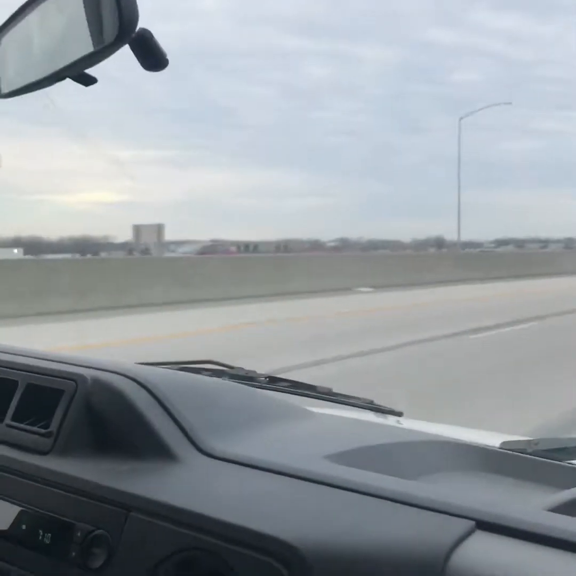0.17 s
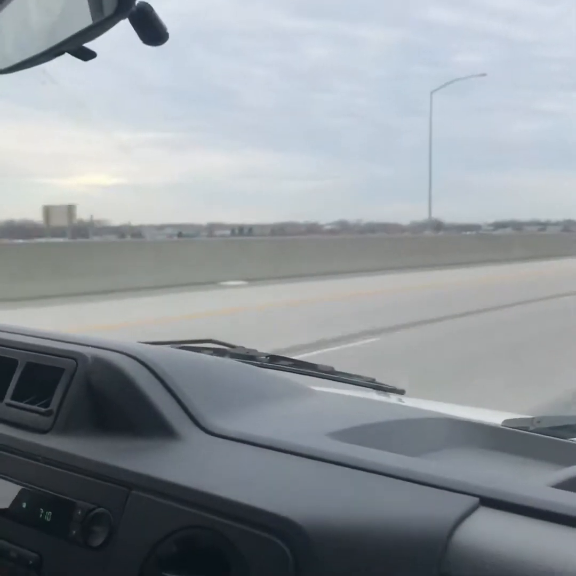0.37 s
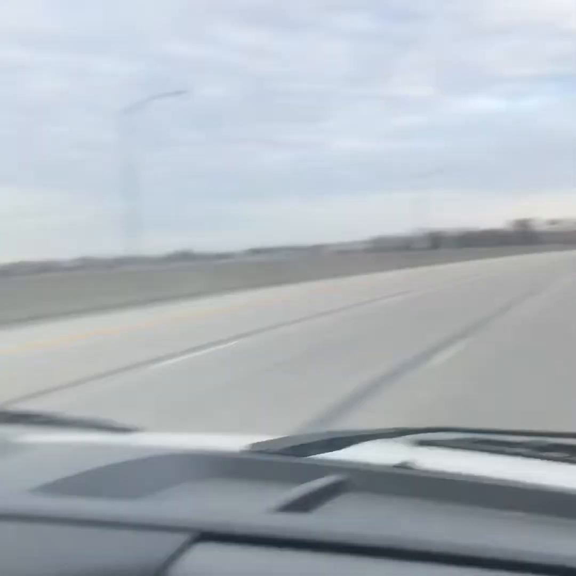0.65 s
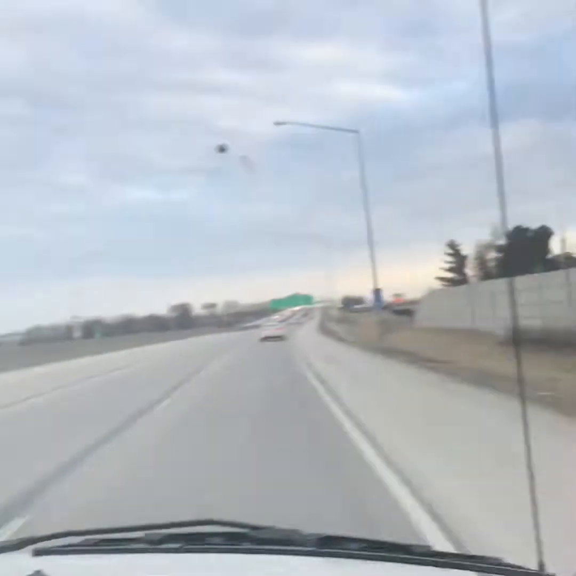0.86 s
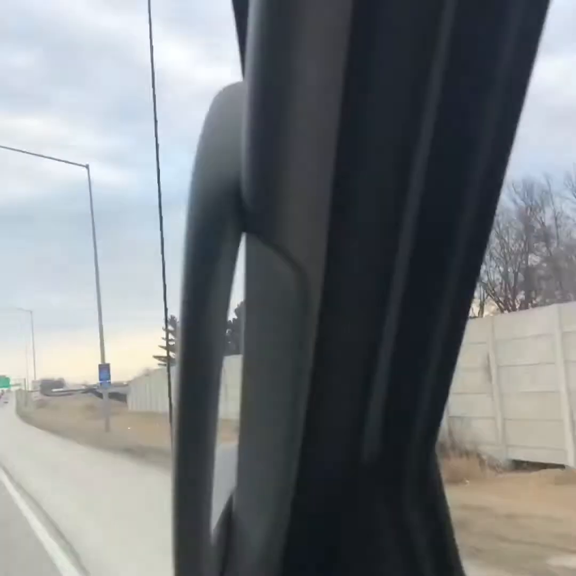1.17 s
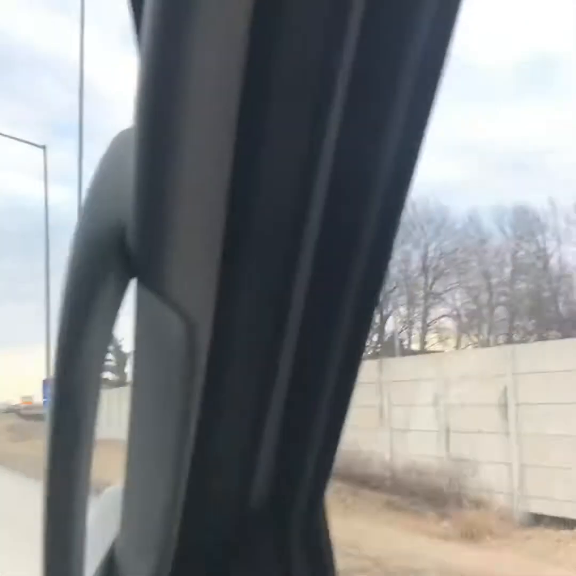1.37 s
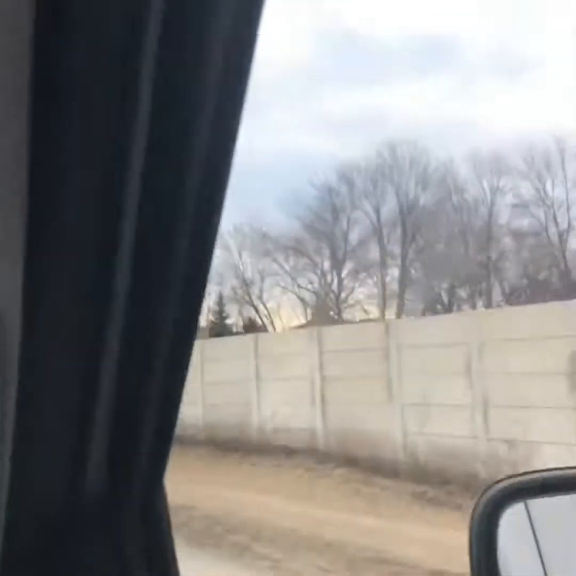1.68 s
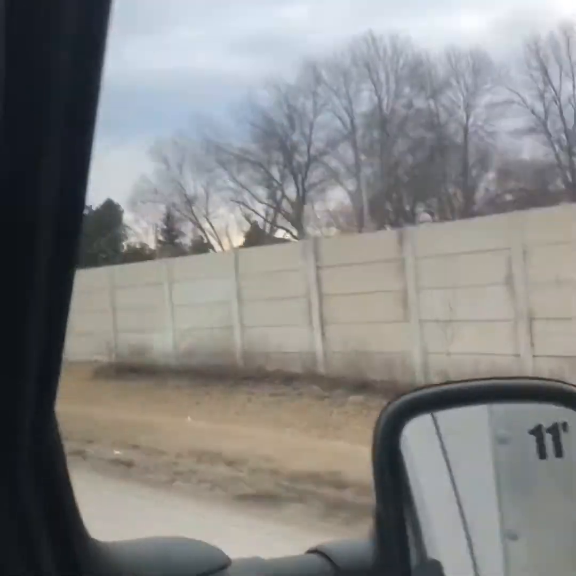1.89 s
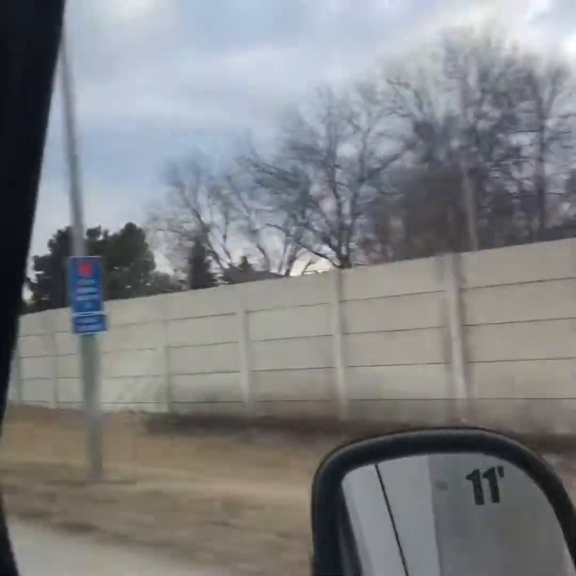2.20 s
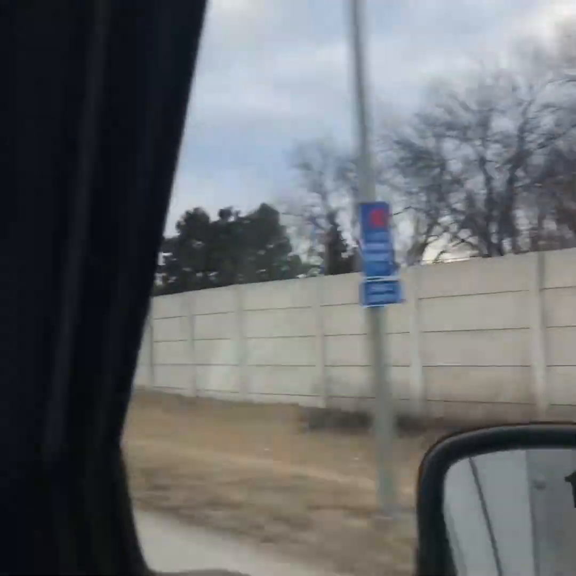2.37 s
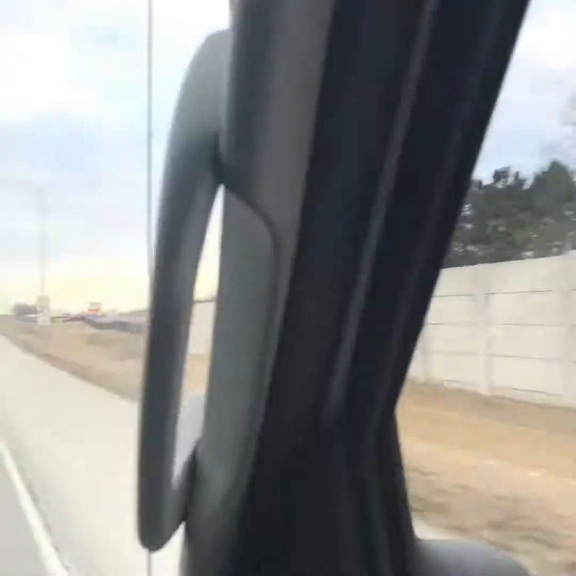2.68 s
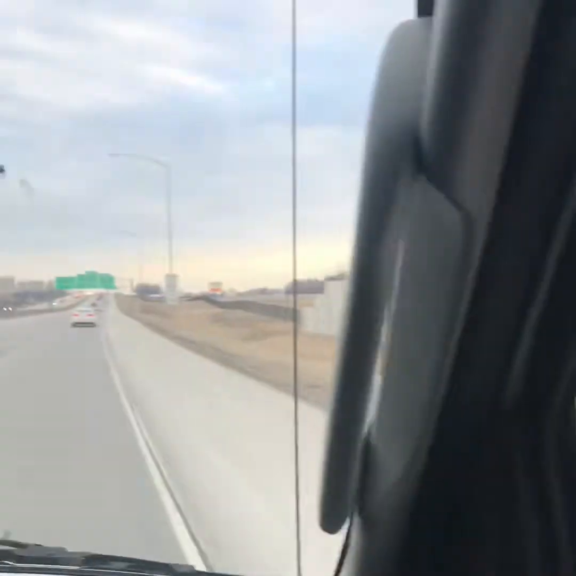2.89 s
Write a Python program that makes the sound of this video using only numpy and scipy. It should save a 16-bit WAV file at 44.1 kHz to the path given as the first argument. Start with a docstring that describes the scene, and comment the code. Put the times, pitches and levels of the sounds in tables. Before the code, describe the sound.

Steady truck engine drone and highway rumble inside the cab, with faint whistling wind.

```python
"""A truck engine drones at cruising speed, heard inside the cab through a hand-held phone.
Its periodic firing gives harmonics of the four-stroke cycle. The highway shakes the body, exciting
a rumble, booming cab resonances and damped thumps. Tyre hiss passes through the panels, air rushes
over the cab, and wind sings at the door and mirror with a breathy, wavering pitch.
Loose trim ticks and crackles faintly."""
import sys
import numpy as np
from scipy import signal
from scipy.fft import rfft, irfft, next_fast_len
from scipy.io import wavfile

SR = 44100
rng = np.random.default_rng(int(sys.argv[2]) if len(sys.argv) > 2 else 0)


def bounce(signal):
    """Save signal as a 16-bit WAV file at the path given by the first command-line argument."""
    frames = np.transpose(np.atleast_2d(signal))
    limited = np.clip(frames, -1, 1)
    pcm = np.round(limited * 32767).astype(np.int16)
    wavfile.write(sys.argv[1], SR, pcm)


N = 134505
T = np.arange(N) / SR

# Levels in the tables are relative: the functions apply further gains.
# Harmonics of the four-stroke cycle: harmonic_number, level_db
ENGINE_HARMONICS = [(2, -37.5), (3, -30), (4, -40.5), (6, -38), (9, -54), (10, -45.5), (12, -55.5),
                    (15, -52.5), (16, -60), (17, -61), (18, -56.5), (19, -62), (20, -64.5), (25, -63),
                    (28, -57), (29, -64), (30, -60), (33, -65), (68, -57)]
# Cab resonances driven by the wheels: centre_hz, half_width_hz, level_db
CAB_MODES = [(31.3, 1.7, -29.5), (41.5, 7.6, -30), (96.6, 2.7, -40)]
# Spectrum of the road rumble: frequency_hz, density_db
ROAD_SPECTRUM = [(8, -37), (20, -9), (29, 0.5), (45, -1.5), (58, -7.5), (78, 0.5), (125, -5), (165, -7.5),
                 (200, -19), (270, -21), (350, -26), (430, -31.5), (700, -43.5), (1500, -77)]
# Envelope of the rumble and cab resonances: time_s, level_db
ROAD_ENVELOPE = [(0, -3), (.2, 0), (.55, -1), (.7, 1), (1.0, -1), (1.23, -1.5), (1.35, -1.5), (1.55, -1),
                 (1.7, -1), (2.05, 1.5), (2.35, 1.6), (2.7, -2), (2.85, -1), (3.0, -1)]
# Thumps from bumps in the road: start_s, pitch_hz, peak_db, decay_s
ROAD_BUMPS = [(.61, 65, -18, 0.035), (0.671, 99, -18.5, 0.023), (.955, 63.5, -22.5, 0.026),
              (1.21, 53.4, -15, 0.029), (1.515, 64, -13.5, .04), (1.547, 89.6, -14.5, 0.022),
              (2.275, 45.8, -15, 0.038), (2.41, 90, -14, 0.011)]
# Spectrum of tyre noise behind the panels: frequency_hz, density_db
TYRE_SPECTRUM = [(200, -13), (400, -4.5), (520, -2), (660, -3), (770, -3), (840, 1), (1100, -.5),
                 (1200, -1.5), (1350, 1.5), (1600, -2), (1720, -5), (1810, -12.5), (2000, -16), (2600, -31),
                 (4000, -57.5)]
# Spectrum of air rushing over the cab: frequency_hz, density_db
AIR_SPECTRUM = [(900, -38), (1750, -8.5), (1930, -4.5), (2060, -1), (2250, 1), (2460, 1), (2650, -4),
                (2900, -11), (3100, -14), (3500, -21.5), (4400, -27.5), (4950, -34), (6000, -36),
                (7500, -42.5), (10000, -49)]
# Two wind tones at the door: time_s, upper_pitch_hz, upper_level_db, lower_level_db
WIND_TONES = [(0, 1424, -50, -53), (.22, 1402, -38.5, -43), (.3, 1405, -47, -52), (.45, 1421, -45.5, -50),
              (.55, 1440, -40, -45), (.65, 1429, -44, -49), (.72, 1445, -50, -47.5), (.92, 1479, -48, -53),
              (1.01, 1496, -41.5, -46), (1.08, 1458, -43.5, -41), (1.14, 1468, -41, -41),
              (1.22, 1475, -54, -45), (1.29, 1485, -43, -53.5), (1.37, 1484, -54, -51),
              (1.46, 1474, -40.5, -41.5), (1.53, 1469, -42.5, -46), (1.7, 1465, -51.5, -46.5),
              (1.87, 1435, -40.5, -51), (1.95, 1428, -48.5, -56), (2.01, 1441, -39.5, -54),
              (2.17, 1436, -45, -62.5), (2.35, 1425, -41.5, -63), (2.46, 1438, -49, -56),
              (2.55, 1460, -47.5, -50), (2.75, 1494, -44, -47.5), (2.85, 1479, -50, -48),
              (3.04, 1482, -43, -47)]
# Envelope of a third, higher wind tone: time_s, level_db
THIRD_TONE_ENVELOPE = [(0, -59), (.95, -54), (1.08, -47), (1.14, -52), (1.21, -44.5), (1.35, -54.5),
                       (1.7, -58), (3.0, -58)]
# Impacts of loose trim: peak_time_s, level_db, decay_s
TRIM_TICKS = [(.113, -64, .003), (.613, -54, .005), (.625, -52, .003), (.748, -53, .002), (.848, -55, .003),
              (.868, -62, .003), (1.381, -62, .003), (1.412, -59.5, .003), (1.513, -66, .005),
              (1.521, -51, .003), (1.569, -56, .002), (1.739, -62, .002), (1.818, -57, .008),
              (1.83, -61, .016)]
# Spectrum of the ticks: frequency_hz, density_db
TICK_SPECTRUM = [(2000, -7.5), (3400, 6), (5200, -1.5), (7000, -14), (10000, -24), (14000, -32.5)]
# Spectrum of the fine trim chatter: frequency_hz, density_db
CRACKLE_SPECTRUM = [(3000, -4), (4200, 4.5), (6500, -1), (10400, -11.5), (12700, -3.5), (15500, -7.5)]
# Spectrum of microphone self-noise: frequency_hz, density_db
HISS_SPECTRUM = [(3000, 2.5), (7000, -11), (9000, 1.5), (10400, -12.5), (11500, -1.5), (12700, 2.5),
                 (15500, 5.5)]


def undb(db):
    """Amplitude grows tenfold for every 20 decibels."""
    return 10 ** (np.asarray(db) / 20)


def noise(gain_at):
    """Spectral shaping: white noise is weighted by a function of frequency and scaled to unit rms."""
    size = next_fast_len(N, True)
    hz = np.maximum(np.arange(size // 2 + 1) * SR / size, 1)
    shaped = irfft(rfft(rng.standard_normal(size)) * gain_at(hz), size)[:N]
    return shaped / np.std(shaped)


def coloured_noise(spectrum):
    """Unit-rms noise whose spectrum follows a power law between the points of a table."""
    hz, db = np.array(spectrum).T
    return noise(lambda f: undb(np.interp(np.log(f), np.log(hz), db)))


def curve(rows, column=1):
    """Linear interpolation in time of one column of a table."""
    rows = np.array(rows)
    return np.interp(T, rows[:, 0], rows[:, column])


def drift(cutoff_hz):
    """Low-pass noise gives a slow random fluctuation of unit rms."""
    return noise(lambda f: 1 / (1 + (f / cutoff_hz) ** 4))


def flickering_noise(spectrum, flicker_db, rate_hz, bands=6):
    """Independent amplitude modulation of overlapping bands makes a noise flicker in colour."""
    log_centres = np.log(np.geomspace(spectrum[0][0], spectrum[-1][0], bands))
    size = next_fast_len(N, True)
    bins = rfft(coloured_noise(spectrum), size)
    log_hz = np.log(np.maximum(np.arange(len(bins)) * SR / size, 1))
    out = 0
    for weights in np.eye(bands):
        band = irfft(bins * np.interp(log_hz, log_centres, weights), size)[:N]
        out = out + band * undb(flicker_db * drift(rate_hz))
    return out


def resonance(centre_hz, half_width_hz):
    """A randomly driven resonator gives narrow-band noise about its centre, which may move."""
    phase = 2 * np.pi * np.cumsum(centre_hz * np.ones(N)) / SR
    skirt = lambda f: 1 / (1 + (f / half_width_hz) ** 2)
    return noise(skirt) * np.cos(phase) + noise(skirt) * np.sin(phase)


def engine(cycle_hz=20.6, speed_wander=0.00094, waver_db=1.63, gain_db=1.77):
    """Periodic firing gives a harmonic series; each line wavers, and flutters under the uneven load."""
    cycles = np.cumsum(cycle_hz * (1 + speed_wander * drift(1.81))) / SR
    out = 0
    for harmonic, db in ENGINE_HARMONICS:
        phase = 2 * np.pi * (harmonic * cycles + rng.random())
        flutter = .36 * resonance(harmonic * cycle_hz, half_width_hz=8)
        out = out + undb(db + waver_db * drift(0.87)) * (np.sin(phase) + flutter)
    return np.sqrt(2) * undb(gain_db) * out


def road_rumble():
    """Forced vibration: the road surface shakes the body and sets the cab's resonances booming."""
    booms = sum(undb(db) * resonance(hz, half_width) for hz, half_width, db in CAB_MODES)
    rumble = undb(-23.5) * flickering_noise(ROAD_SPECTRUM, flicker_db=0.18, rate_hz=2.9)
    return (rumble + booms) * undb(curve(ROAD_ENVELOPE))


def road_bumps(attack_s=0.002):
    """Damped oscillation: each bump gives the cab a low thump that dies within a few swings."""
    out = 0
    for start_s, hz, peak_db, decay_s in ROAD_BUMPS:
        age = np.maximum(T - start_s, 0)
        envelope = (1 - np.exp(-age / attack_s)) * np.exp(-age / decay_s)
        out = out + undb(peak_db) * envelope / envelope.max() * np.sin(2 * np.pi * hz * age)
    return out


def tyres_and_air(fade_db_per_s=-0.65):
    """Panel transmission lets in broadband noise from the tyres and airflow; both ease slowly."""
    tyres = undb(-39.5) * flickering_noise(TYRE_SPECTRUM, flicker_db=0.5, rate_hz=8.6)
    air = undb(-44.5) * flickering_noise(AIR_SPECTRUM, flicker_db=0.93, rate_hz=13)
    return (tyres + air) * undb(fade_db_per_s * (T - T.mean()))


def wind_song(pitch_waver=0.00897, lower_ratio=.652, third_ratio=1.07, flicker_db=2.5):
    """Turbulence excites three breathy resonances that glide together with the airflow."""
    hz = curve(WIND_TONES) * (1 + pitch_waver * drift(12.04))
    phase = 2 * np.pi * np.cumsum(hz) / SR
    # The upper tone is a thin whistle inside a band of noise.
    whistle = np.sqrt(2) * undb(-3.5 + flicker_db * drift(15)) * np.sin(phase)
    breath = undb(-3.5) * resonance(hz, half_width_hz=63)
    upper = undb(curve(WIND_TONES, column=2)) * (whistle + breath)
    lower = undb(curve(WIND_TONES, column=3) - 2) * resonance(hz * lower_ratio, half_width_hz=70)
    third = undb(curve(THIRD_TONE_ENVELOPE)) * resonance(hz * third_ratio, half_width_hz=27)
    return upper + lower + third


def trim_ticks(attack_s=0.0023):
    """Impacts of loose plastic radiate dry noise bursts that rise and decay exponentially."""
    envelope = 0
    for peak_s, db, decay_s in TRIM_TICKS:
        before, after = np.maximum(peak_s - T, 0), np.maximum(T - peak_s, 0)
        envelope = envelope + undb(db) * np.exp(-before / attack_s - after / decay_s)
    return envelope * coloured_noise(TICK_SPECTRUM)


def trim_crackle(grains_per_s=160, spread_db=2.6, decay_s=.0012, fade_db_per_s=-3):
    """Vibrating trim chatters as a Poisson process: tiny random grains, fading in level."""
    onsets = rng.random(N) < grains_per_s / SR
    impulses = onsets * undb(spread_db * rng.standard_normal(N))
    envelope = signal.lfilter([1], [1, -np.exp(-1 / (decay_s * SR))], impulses)
    chatter = envelope * coloured_noise(CRACKLE_SPECTRUM)
    return chatter / np.std(chatter) * undb(-71.5 + fade_db_per_s * T)


def scene():
    """Superposition: the pressures of all sources in the cab add in one channel."""
    drone = engine() + road_rumble() + road_bumps()
    return (drone + tyres_and_air() + wind_song() + trim_ticks() + trim_crackle())[None]


def record(dry, cutoff_hz=15700, fade_db_per_s=-.5):
    """Self-noise and band limiting: the phone adds a faint, easing hiss and cuts the top treble."""
    hiss = undb(-70.5 + fade_db_per_s * (T - T.mean())) * coloured_noise(HISS_SPECTRUM)
    low_pass = signal.ellip(10, .2, 80, cutoff_hz, fs=SR, output="sos")
    return signal.sosfilt(low_pass, dry + hiss)


dry = scene()
out = record(dry)
bounce(out)
```